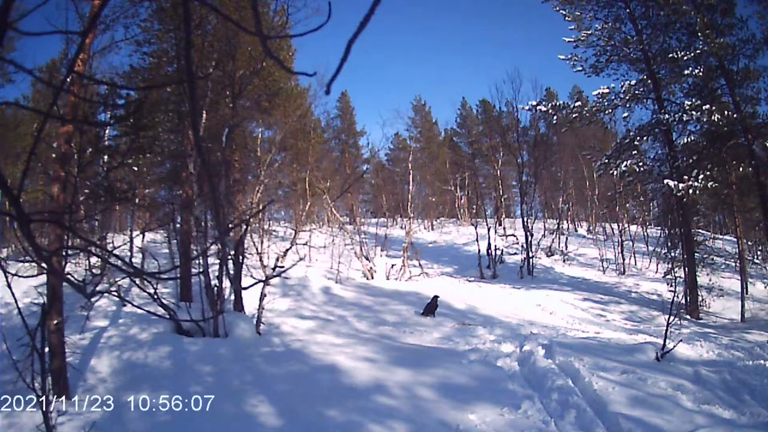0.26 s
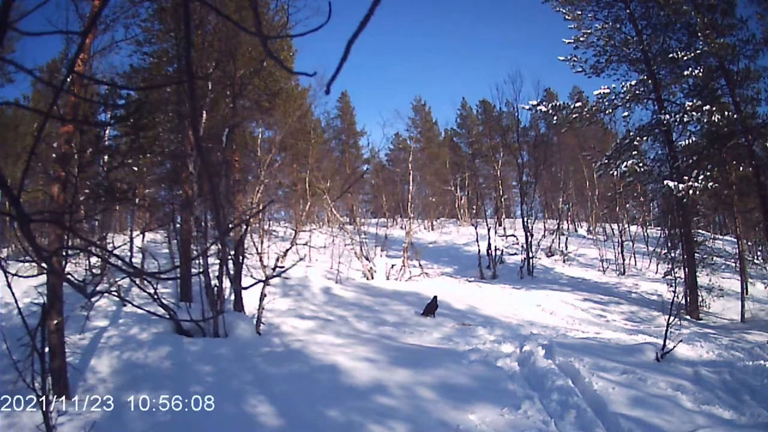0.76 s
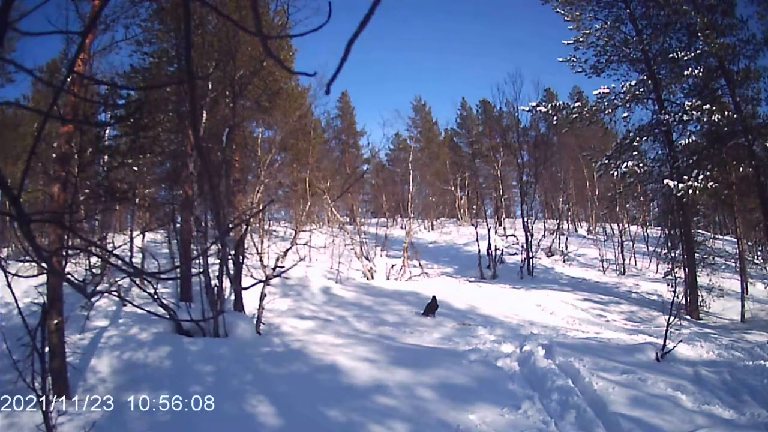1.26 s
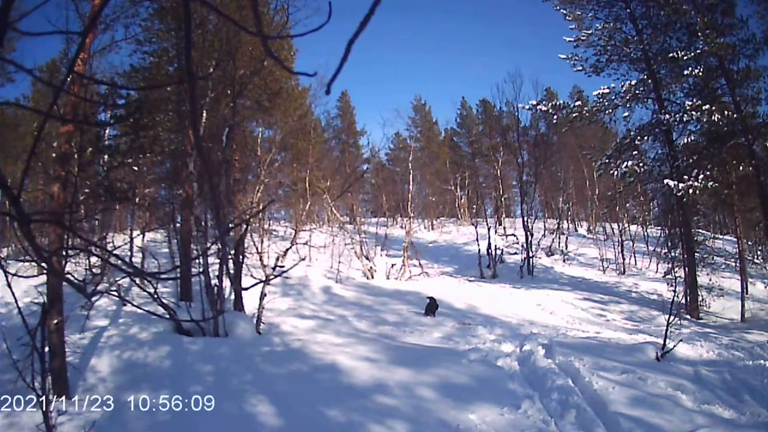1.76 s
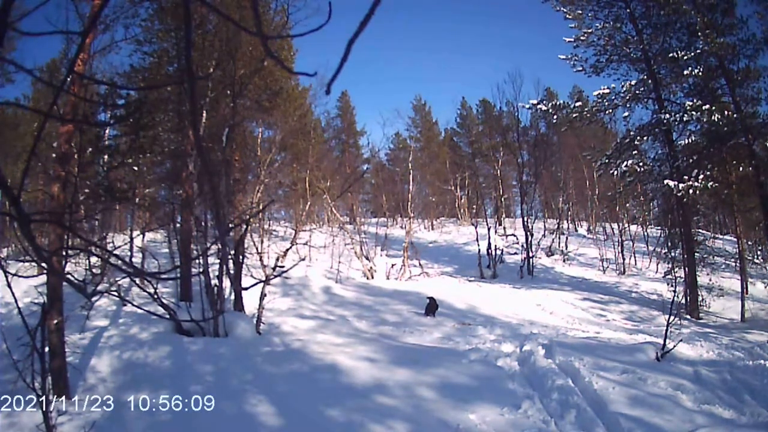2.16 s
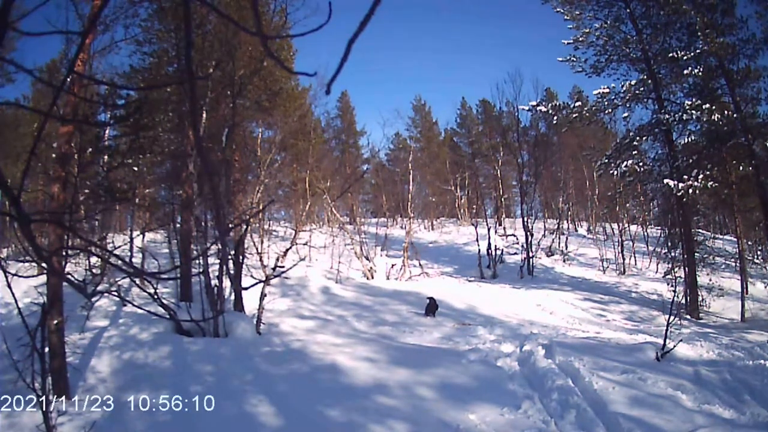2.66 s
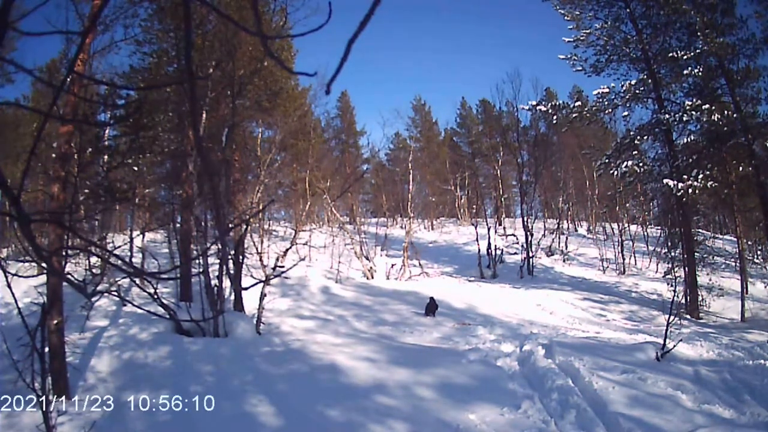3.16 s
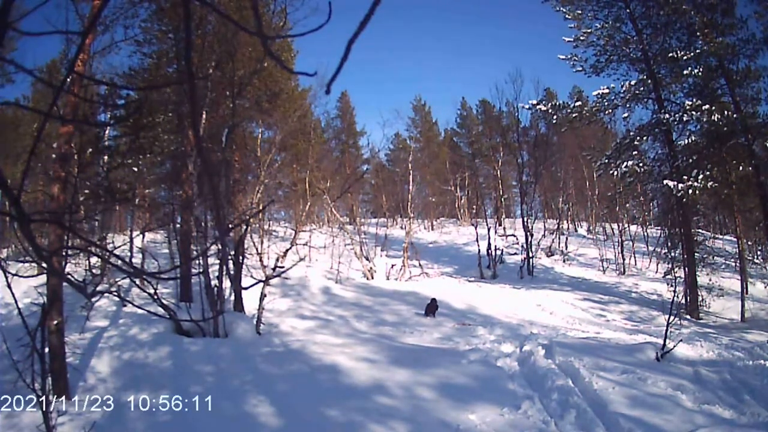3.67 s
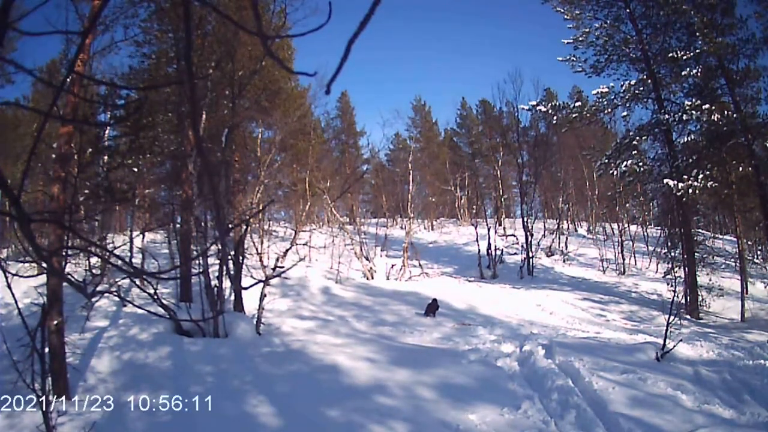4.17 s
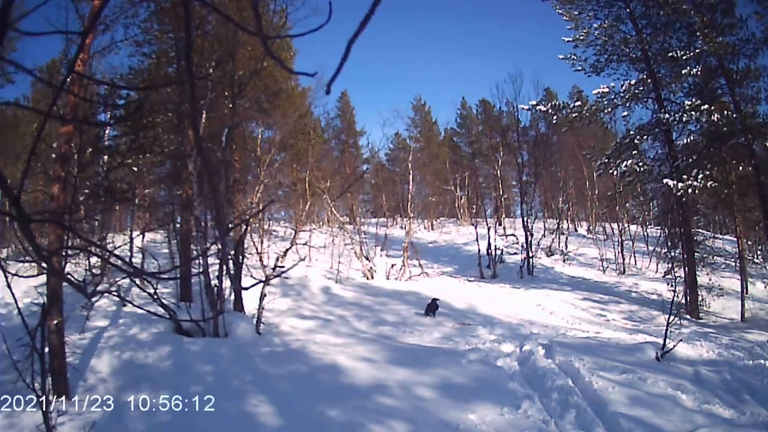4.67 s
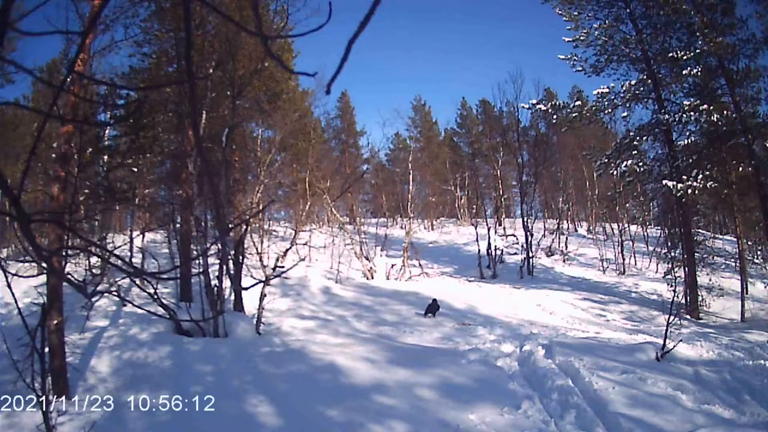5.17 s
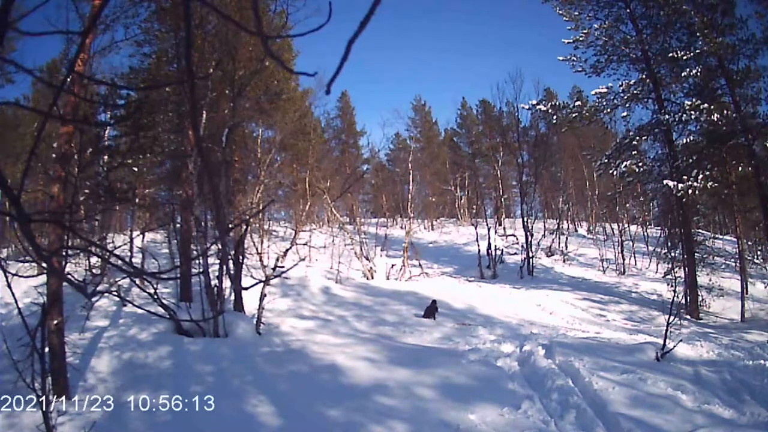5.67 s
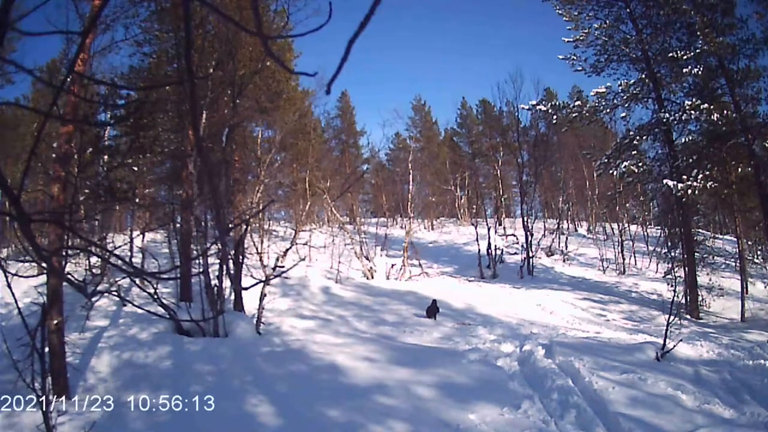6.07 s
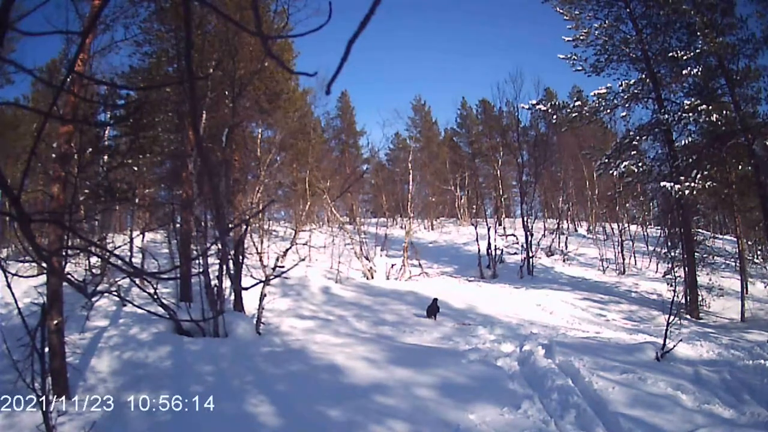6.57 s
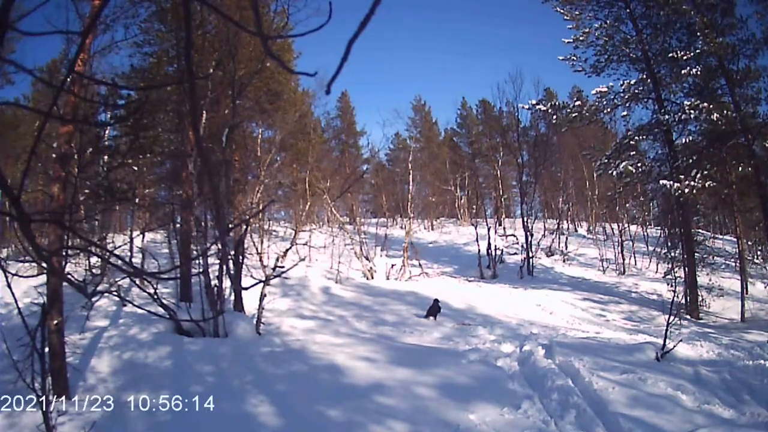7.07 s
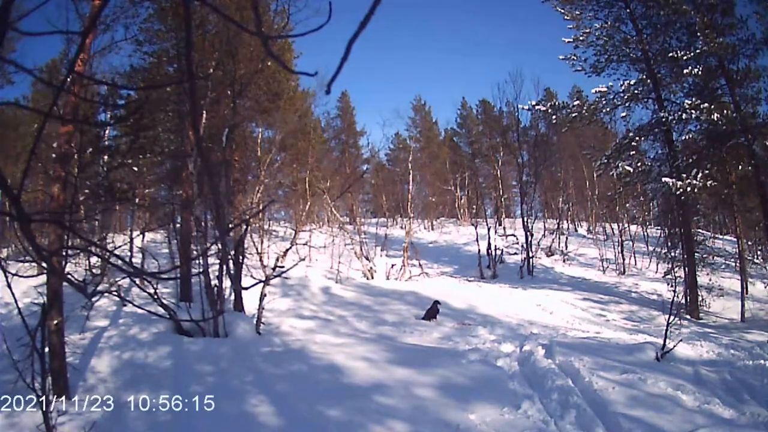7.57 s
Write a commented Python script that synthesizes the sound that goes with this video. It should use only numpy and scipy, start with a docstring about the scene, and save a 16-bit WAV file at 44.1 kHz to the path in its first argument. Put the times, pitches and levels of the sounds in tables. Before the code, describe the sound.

A raven gives two short, low, rattling croaks in a snowy forest clearing, with faint small-bird chirps, a twig snap and steady hiss.

```python
"""The end of a wheezy bird call, over hiss and a faint electronic whine; then small birds, a twig snap, dry ticks.
A raven on the snow of a forest clearing gives two low, rattling croaks that echo softly among the trees.
Croaks are fluttered pulse runs through throat resonances; the birds are gliding sines, some turning to rasp.
Snap and ticks are short ringing bursts. Hiss, puffs and far calls are shaped noise; the whine is a gated buzz."""
import sys
import numpy as np
from scipy import signal
from scipy.fft import rfft, irfft
from scipy.io import wavfile

SR = 44100
rng = np.random.default_rng(int(sys.argv[2]) if len(sys.argv) > 2 else 0)


def output_pcm(signal):
    """Save a mono or channel-first signal as 16-bit PCM at the path in sys.argv[1].

    Samples are clipped to [-1, 1] before scaling.
    """
    pcm = np.clip(np.atleast_2d(signal).T, -1, 1) * 32767
    wavfile.write(sys.argv[1], SR, np.round(pcm).astype(np.int16))


N = 345303
T = np.arange(N) / SR


def undb(db):
    """Decibels to gain."""
    return 10 ** (np.asarray(db) / 20)


def unit(x):
    """Scale to rms 1."""
    return x / np.sqrt(np.mean(x ** 2) + 1e-20)


def add(out, s, x):
    """Mix x into out from time s on; cut whatever falls outside."""
    i = int(s * SR)
    x, i = x[max(-i, 0):], max(i, 0)
    out[i:i + len(x)] += x[:max(N - i, 0)]


def ring(x, hz, width_hz):
    """One resonance, gain 1 at its centre."""
    return signal.lfilter(*signal.iirpeak(min(hz, SR * .45), hz / width_hz, fs=SR), x)


def body(x, modes):
    """Several resonances side by side, with alternating sign."""
    return sum((-1) ** k * undb(db) * ring(x, hz, width) for k, (hz, width, db) in enumerate(modes))


def lowpass(x, hz, order):
    """Butterworth low-pass."""
    return signal.sosfilt(signal.butter(order, hz, fs=SR, output="sos"), x)


def turn(hz):
    """Phase in radians of a moving frequency."""
    return 2 * np.pi * np.cumsum(hz) / SR


def waver(n, hz):
    """Smooth chance of rms 1: noise low-passed at hz."""
    return unit(lowpass(rng.standard_normal(n), hz, order=2))


def arch(n, crest):
    """Two ramps: one runs from 1 to 0 up to the crest of a call, the other from 0 to 1 after it."""
    u = np.linspace(0, 1, n)
    return np.clip(1 - u / crest, 0, 1), np.clip((u - crest) / (1 - crest), 0, 1)


FLUTTER_FIRST_HZ, FLUTTER_LAST_HZ = 41.05, 36.8  # the rattle slows through each croak
SLACK_HZ = 345  # voice pitch with no effort
OPEN_SLACK, OPEN_FULL = .24, .62  # open share of a flutter with no effort and with full effort
RELEASE_S, RELEASE_DROP = 0.045, 0.29  # effort falls by this share as a croak ends
# raven's throat and beak resonances: centre_hz [Hz], width_hz [Hz], gain_db [dB]
THROAT_MODES = [(374, 127, 0), (963, 150, 0.2), (1244, 200, 2), (1440, 200, -3.5), (1850, 300, -6.5),
                (3750, 420, -11.5)]


def croak(length_s, rise_s, full_hz, first_db, full_db, sag=0.19, rasp=0.0485, edge_hz=1600,
          leak_db=-17, bright_db=14, kick=0.7):
    """A slow flutter opens the syrinx about 39 times a second; each opening lets out a short run of voice pulses.
    Effort builds, holds and lets go: it makes the runs higher, longer and louder."""
    run_jitter, pulse_jitter, scatter_db = .008, .016, 1.0
    n = int(length_s * SR)
    release = np.interp(T[:n], [length_s - RELEASE_S, length_s], [1, 1 - RELEASE_DROP])
    effort = np.sin(np.pi / 2 * np.minimum(T[:n] / rise_s, 1)) * release
    cycle = np.floor(np.cumsum(np.linspace(FLUTTER_FIRST_HZ, FLUTTER_LAST_HZ, n)) / SR)
    flutter_samples = SR / np.mean([FLUTTER_FIRST_HZ, FLUTTER_LAST_HZ])
    pulses = np.zeros(SR // 2)
    for i in np.flatnonzero(np.diff(cycle, prepend=-1)):
        hz = SLACK_HZ + (full_hz - SLACK_HZ) * effort[i]
        hz *= 1 + run_jitter * rng.standard_normal()
        span = (OPEN_SLACK + (OPEN_FULL - OPEN_SLACK) * effort[i]) * flutter_samples
        db = first_db + (full_db - first_db) * effort[i] ** 2
        lag = 0
        for louder, later in rng.standard_normal(size=(12, 2)):
            if lag >= span or i + lag >= n:
                break
            # the first pulse is the hardest; the pitch sags as the pressure is spent
            hardness = 1 + kick * np.exp(-lag / SR / 0.0012)
            pulses[int(i + lag)] += undb(db + scatter_db * louder) * hardness
            lag += SR / hz * (1 + sag * ((lag / span) ** 2 - .25) + pulse_jitter * later)
    # a puff of turbulence trails every pulse
    trail = signal.lfilter([1], [1, -np.exp(-1 / (SR * 0.0011))], pulses)
    puff = trail * rng.standard_normal(len(pulses))
    voice = body(pulses + rasp * puff, THROAT_MODES)
    # little sounds above edge_hz, except in the first, bright flutters
    leak = undb(leak_db + bright_db * np.exp(-T[:len(voice)] / 0.051))
    low = lowpass(voice, edge_hz, order=10)
    high = voice - lowpass(voice, edge_hz, order=1)
    return undb(34.5) * (low + leak * high)


# croaks: start_s [s], length_s [s], rise_s to full effort [s], full_hz at full effort [Hz],
# first_db and full_db: pulse drive at no and at full effort [dB, before the make-up gain]
CROAK_CALLS = [(4.4984, .218, .13, 490.6, -54, -45), (4.93, .215, 0.112, 478, -49, -43.5)]


def raven():
    """Both croaks, each a fluttering run of throat pulses."""
    out = np.zeros(N)
    for start_s, *shape in CROAK_CALLS:
        add(out, start_s, croak(*shape))
    return out


WHEEZE_FIRST, WHEEZE_LAST = .92, .8  # pitch at the two ends, as a share of the crest, before the break step
WHEEZE_WOBBLE_HZ, WHEEZE_JUMP_HZ, WHEEZE_JUMP_S = 35, 45, .016  # rms, rms, time between jumps
BREAK_S, BREAK_HZ, BREAK_DB = 0.0074, -220, -11.5  # how quickly the tone breaks, its step in pitch and level
# wheezy calls: start_s [s], length_s [s], break_s after the start [s], crest_hz [Hz],
# level_db at the crest [dB], hoarse_db against the clean tone [dB]
WHEEZE_CALLS = [(-.125, .185, .17, 4100, -53.5, -8), (0.184, 0.24, 0.23, 3700, -56.5, -5.5),
                (1.568, 0.21, 0.17, 3846, -56.5, -3.5), (1.851, 0.12, 0.11, 3660, -58, -4),
                (3.488, .18, .092, 3726, -56.5, -7.5), (6.727, 0.22, 0.15, 3870, -50.5, -10.5),
                (6.999, .195, .145, 3720, -52, -7)]


def wheezes(crest=.38, hoarse_hz=520, overtone_db=-20, buzz_hz=620, buzz_db=-14, air_db=-19, onset_db=-10):
    """Whistles that rise, hold and droop in small jumps, until the clean tone breaks and leaves a lower rasp."""
    out = np.zeros(N)
    for start_s, length_s, break_s, crest_hz, level_db, hoarse_db in WHEEZE_CALLS:
        n = int(length_s * SR)
        rise, fall = arch(n, crest)
        broken = (1 + np.tanh((T[:n] - break_s) / BREAK_S)) / 2
        bend = 1 - (1 - WHEEZE_FIRST) * rise ** 3 - (1 - WHEEZE_LAST) * fall ** 2.6
        hz = crest_hz * bend + BREAK_HZ * broken
        jumps = rng.standard_normal(size=32)[(T[:n] / WHEEZE_JUMP_S).astype(int)]
        phase = turn(hz + WHEEZE_JUMP_HZ * jumps + WHEEZE_WOBBLE_HZ * waver(n, 70))
        flicker = undb(2.3 * waver(n, 60))
        # period doubling adds a strand at one and a half times the pitch, a fast buzz one on either side of it
        buzz = turn(buzz_hz + 45 * waver(n, 114))
        strands = undb(overtone_db) * np.sin(phase + phase / 2)
        strands += undb(buzz_db) * (np.sin(phase + buzz) + np.sin(phase - buzz) / 2)
        # chaotic vibration smears the tone into a band around its pitch
        hoarse = waver(n, hoarse_hz) * np.sin(phase) + waver(n, hoarse_hz) * np.cos(phase)
        breath = unit(ring(ring(rng.standard_normal(n), 5200, 1900), 5200, 1900))
        # tone and rasp flicker in opposite directions
        voice = np.sqrt(2) * (np.sin(phase) + strands) / flicker * undb(BREAK_DB * broken)
        rasp = undb(hoarse_db) * hoarse * flicker + undb(air_db) * breath
        swell = undb(level_db + onset_db * rise ** 2 - 7.4 * fall ** 2) * signal.windows.tukey(n, .1)
        add(out, start_s, swell * (voice + rasp))
    return out


SLIDE_HZ_PER_S = 11300
NOTCH_AT, NOTCH_S, NOTCH_HZ = .62, 0.00323, 560  # place as a share of the call, half length, depth
# thin calls: start_s [s], length_s [s], slide_hz where the notch sits, without its dip [Hz],
# level_db at the notch [dB], upper_db of the higher voice there [dB]
TSIP_CALLS = [(1.06, 0.047, 6840, -47.5, -66), (1.311, .042, 7250, -60, -69), (1.45, 0.04, 7120, -52, -70),
              (3.200, 0.029, 7200, -59.5, -79), (3.270, .045, 7100, -61, -80),
              (4.110, .043, 6970, -58, -70), (4.179, 0.057, 7300, -57, -67), (4.477, 0.059, 7250, -58, -64),
              (4.553, .052, 7630, -57, -68), (6.282, 0.046, 7200, -62, -80), (6.389, 0.04, 6680, -55, -77),
              (6.560, 0.06, 7110, -51, -65), (7.783, 0.029, 6820, -55, -70)]


def tsips(swell_s=0.0049, lead=0.37, upper_ratio=1.27):
    """Thin falling notes, loudest at a quick notch in pitch; the syrinx's other side adds a faint higher voice."""
    out = np.zeros(N)
    for start_s, length_s, slide_hz, level_db, upper_db in TSIP_CALLS:
        n = int(length_s * SR)
        t = T[:n] - NOTCH_AT * length_s
        notch = NOTCH_HZ * np.exp(-(t / NOTCH_S) ** 2)
        phase = turn(slide_hz - SLIDE_HZ_PER_S * t - notch + 50 * waver(n, 230))
        swell = (lead + (1 - lead) * np.exp(-(t / swell_s) ** 2)) * signal.windows.tukey(n, .25)
        voices = undb(level_db) * np.sin(phase) + undb(upper_db) * np.sin(upper_ratio * phase)
        add(out, start_s, np.sqrt(2) * swell * voices)
    return out


# whistles: start_s [s], length_s [s], first_hz [Hz], middle_hz [Hz], last_hz [Hz], level_db at the loudest [dB]
WHISTLE_CALLS = [(1.199, 0.054, 6700, 7000, 6260, -56.5), (1.392, .013, 3000, 4600, 7500, -53),
                 (1.395, .057, 5500, 6370, 3400, -54.5), (1.427, 0.032, 7400, 5770, 5000, -51),
                 (2.039, .062, 6750, 6960, 6520, -52.5), (2.198, 0.06, 6700, 7000, 5130, -50.5),
                 (3.005, 0.055, 5600, 7280, 5670, -52), (7.718, .015, 3000, 5500, 6900, -52.5)]


def whistles(crest=0.26, loudest_at=0.8, swell_share=0.12, lead=.48):
    """Pure notes that curve through a level middle and are loudest on the way out."""
    out = np.zeros(N)
    for start_s, length_s, first_hz, middle_hz, last_hz, level_db in WHISTLE_CALLS:
        n = int(length_s * SR)
        rise, fall = arch(n, crest)
        hz = middle_hz + (first_hz - middle_hz) * rise ** 3.5 + (last_hz - middle_hz) * fall ** 2.1
        phase = turn(hz + 50 * waver(n, 280))
        swell = lead + (1 - lead) * np.exp(-((T[:n] / length_s - loudest_at) / swell_share) ** 2)
        swell *= signal.windows.tukey(n, .12)
        add(out, start_s, np.sqrt(2) * undb(level_db) * swell * np.sin(phase))
    return out


def crack(decay_s):
    """A very short burst of breaking fibres: decaying noise."""
    t = np.arange(SR // 30) / SR
    return rng.standard_normal(len(t)) * np.exp(-t / decay_s)


TICK_WIDTH_HZ = 3300  # of each of three passes
# a twig gives way in quick steps: start_s [s], peak_db [dB]
SNAP_STEPS = [(.9160, -31.5), (0.917, -34.5), (0.9176, -36.5), (0.9193, -36)]
# the twig's ring: centre_hz [Hz], width_hz [Hz], gain_db [dB]
TWIG_MODES = [(1810, 210, 1.5), (3260, 290, 1.5), (4230, 450, 4.5), (5400, 410, -1), (5900, 500, 2.5),
              (7240, 530, -13)]
# dry ticks: start_s [s], peak_db [dB], centre_hz [Hz], decay_s [s]
DRY_TICKS = [(2.305, -49, 4500, .001), (2.532, -43.5, 4700, 0.0086), (3.889, -41.5, 5300, 0.00051),
             (4.464, -50, 5800, .0007), (5.3936, -34, 6800, 0.00092), (6.646, -46, 6460, .0007)]


def twigs(step_decay_s=.00003):
    """One snap of steps that ring the twig's modes, and scattered dry ticks of band-passed noise."""
    out = np.zeros(N)
    step = body(np.exp(-T[:SR // 30] / step_decay_s), TWIG_MODES)
    for start_s, peak_db in SNAP_STEPS:
        add(out, start_s, undb(peak_db) * step / abs(step).max())
    for start_s, peak_db, centre_hz, decay_s in DRY_TICKS:
        tick = crack(decay_s)
        for _ in range(3):
            tick = ring(tick, centre_hz, TICK_WIDTH_HZ)
        add(out, start_s, undb(peak_db) * tick / abs(tick).max())
    return out


def forest(x, wet_db, t60_s, gap_s):
    """Direct sound plus many small echoes from trunks; the snow keeps them weak."""
    t = np.arange(SR) / SR
    decay = np.exp(-np.log(1000) * t / t60_s)
    echoes = rng.standard_normal(SR) ** 3 * decay * (t > gap_s)  # cubing makes them sparse
    return x + undb(wet_db) * signal.fftconvolve(x, echoes / np.linalg.norm(echoes))[:N]


# faint hoarse calls from deep in the trees: centre_s [s], half_s [s], level_db [dB]
FAR_SWELLS = [(.68, 0.18, -68.5), (1.154, 0.14, -69), (5.942, 0.15, -69), (6.34, 0.099, -68),
              (6.672, .1, -68)]


def far_birds(hz=3900, width_hz=1900):
    """Distant calls, blurred by the trees into a soft rasp: swells of band-passed noise."""
    swell = sum(undb(level_db) * np.exp(-((T - centre_s) / half_s) ** 2)
                for centre_s, half_s, level_db in FAR_SWELLS)
    return swell * unit(ring(ring(rng.standard_normal(N), hz, width_hz), hz, width_hz))


HISS_DB = -48  # rms
# colour of air and microphone hiss: freq_hz [Hz], density_db [relative dB per Hz]
HISS_COLOUR = [(15, -0.5), (30, -6), (60, -8), (130, -18), (300, -19), (500, -20), (800, -25),
               (1300, -31.5), (2000, -34), (3200, -38.5), (6000, -41.5), (9000, -45), (13500, -46.5),
               (15600, -52.5)]
# puffs of air on the microphone: centre_s [s], half_s [s], level_db [dB]
AIR_PUFFS = [(0.36, 0.029, -33), (2.42, .04, -44), (4.78, 0.032, -47)]


def air():
    """Even hiss over a low rumble, with a few soft low-frequency puffs on the microphone."""
    colour_hz, colour_db = np.transpose(HISS_COLOUR)
    f = np.maximum(np.fft.rfftfreq(N, 1 / SR), 1)
    colour = undb(np.interp(np.log(f), np.log(colour_hz), colour_db))
    hiss = unit(irfft(rfft(rng.standard_normal(N)) * colour, N))
    push = sum(undb(level_db) * np.exp(-((T - centre_s) / half_s) ** 2)
               for centre_s, half_s, level_db in AIR_PUFFS)
    thump = unit(lowpass(ring(rng.standard_normal(N), hz=28, width_hz=15), hz=49.4, order=4))
    return undb(HISS_DB) * hiss + push * thump


FRAME_HZ, BUZZ_HZ, LINE_HZ = 25, 703.125, 5625  # one buzz burst a picture frame, over a steady thin line
BUZZ_DB, BUZZ_SHARE, LINE_DB = -59, 0.798, -81.5  # rms of the ungated fundamental, burst share, rms


def whine(rolloff=1.124):
    """A near-square buzz that starts afresh every frame, so its odd harmonics split into close, beating lines."""
    t = T[:SR // FRAME_HZ]
    buzz = sum(np.sin(2 * np.pi * k * BUZZ_HZ * t) / k ** rolloff for k in range(1, 19, 2))
    gate = np.clip(np.minimum(t, BUZZ_SHARE / FRAME_HZ - t) / 0.0019, 0, 1)
    bursts = np.resize(gate * buzz, N)
    line = np.sin(2 * np.pi * LINE_HZ * T)
    return np.sqrt(2) * (undb(BUZZ_DB) * bursts + undb(LINE_DB) * line)


def scene():
    """Raven, small birds and twigs in the clearing, over the camera's own noise."""
    # the nearest trunks thicken the rattle, the forest edge gives it a tail
    croaks = forest(raven(), wet_db=-13, t60_s=.09, gap_s=.004)
    croaks = forest(croaks, wet_db=-9, t60_s=.85, gap_s=.03)
    small = forest(wheezes() + tsips() + whistles() + twigs(), wet_db=-13.5, t60_s=0.37, gap_s=0.0082)
    return (croaks + small + far_birds() + air() + whine())[None]


TOP_HZ, OFFSET = 15650, -.0503  # offset as a share of full scale


def record(dry):
    """The trail camera cuts the top; its converter sits a little off zero."""
    return signal.sosfilt(signal.ellip(10, .2, 70, TOP_HZ, fs=SR, output="sos"), dry) + OFFSET


dry = scene()
out = record(dry)
output_pcm(out)
```